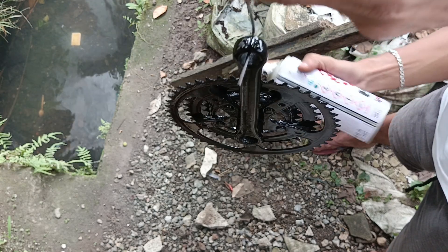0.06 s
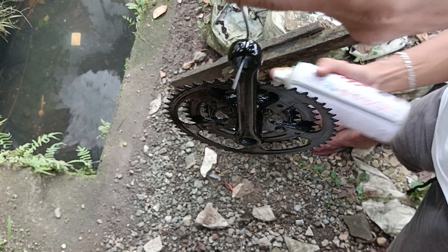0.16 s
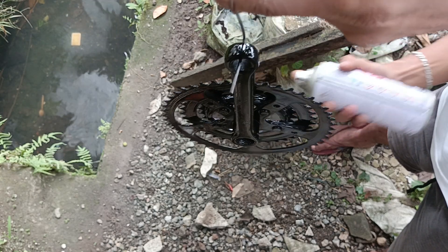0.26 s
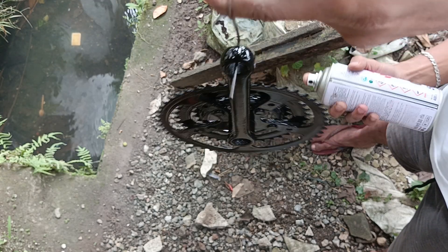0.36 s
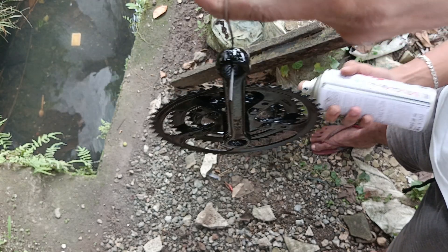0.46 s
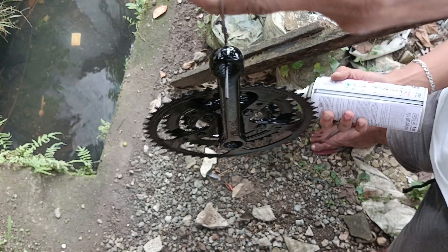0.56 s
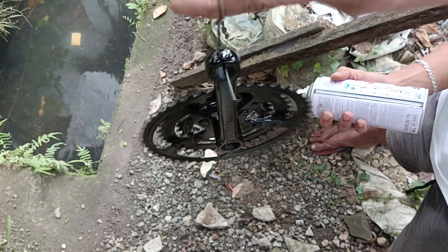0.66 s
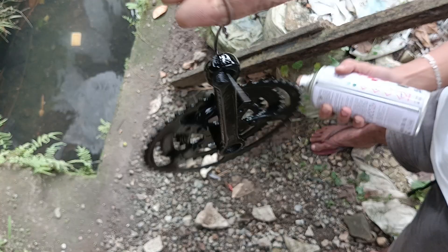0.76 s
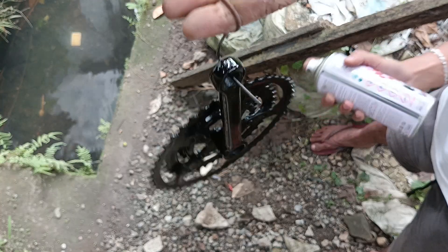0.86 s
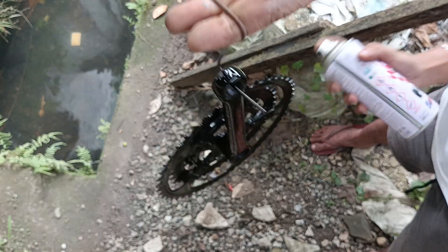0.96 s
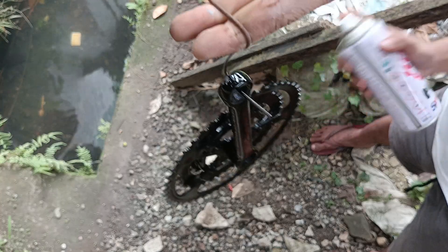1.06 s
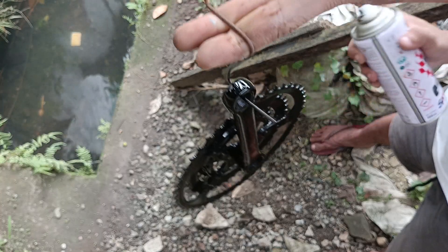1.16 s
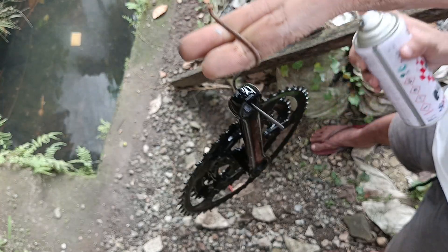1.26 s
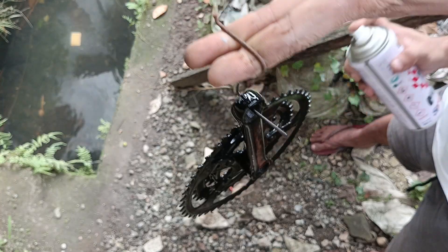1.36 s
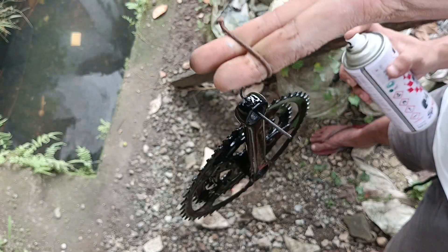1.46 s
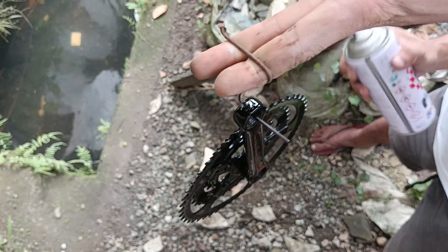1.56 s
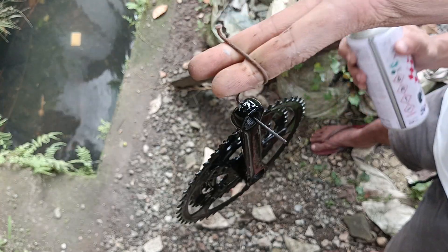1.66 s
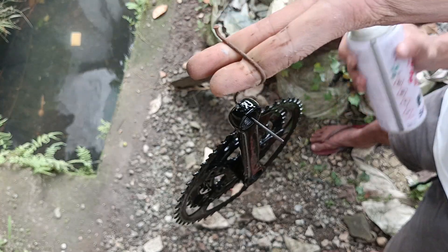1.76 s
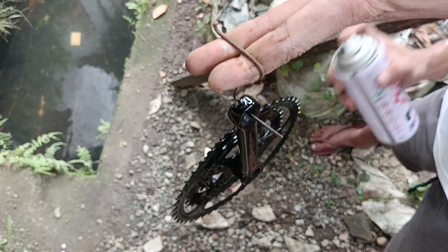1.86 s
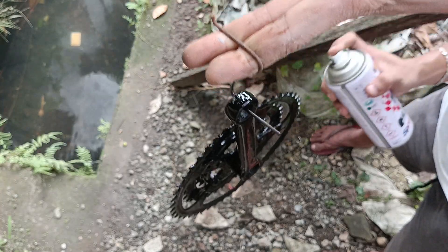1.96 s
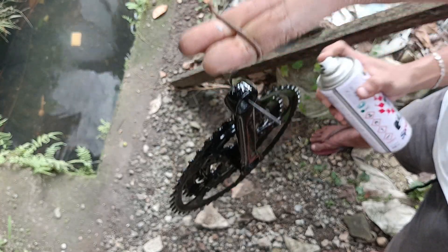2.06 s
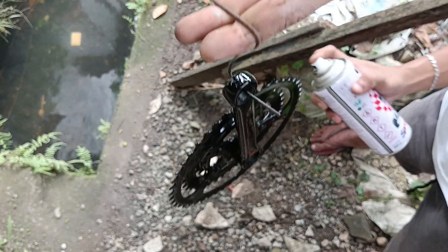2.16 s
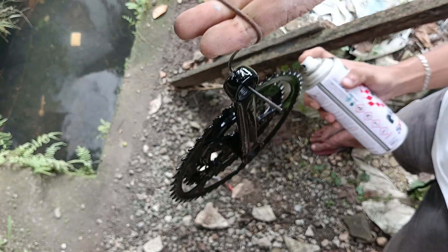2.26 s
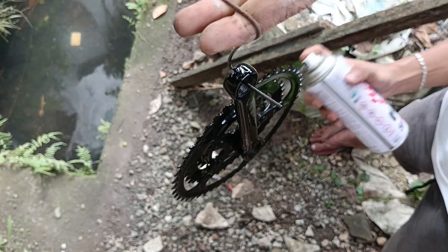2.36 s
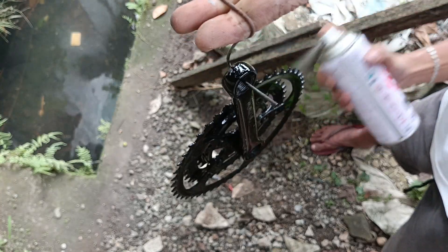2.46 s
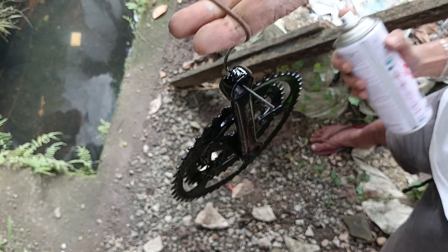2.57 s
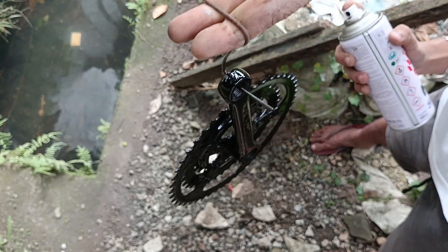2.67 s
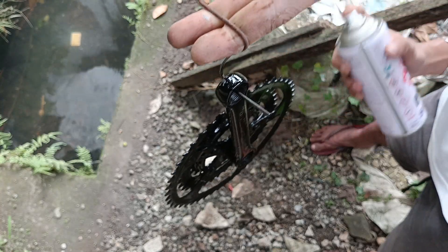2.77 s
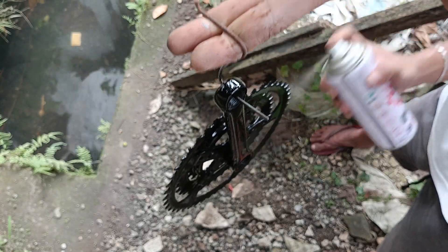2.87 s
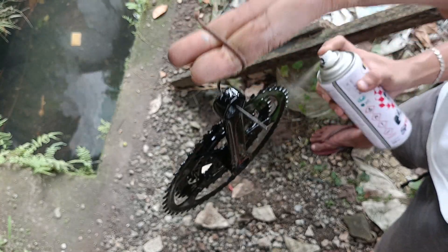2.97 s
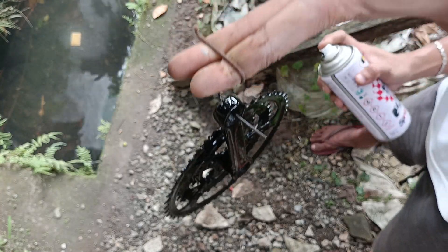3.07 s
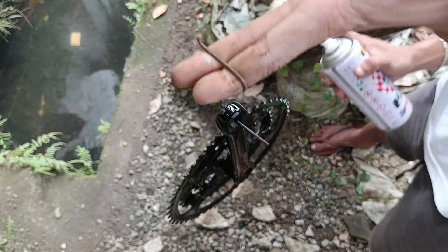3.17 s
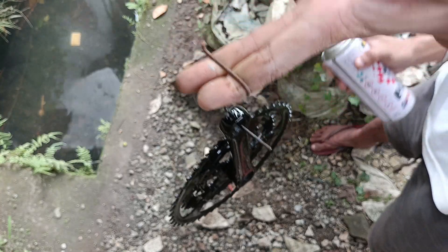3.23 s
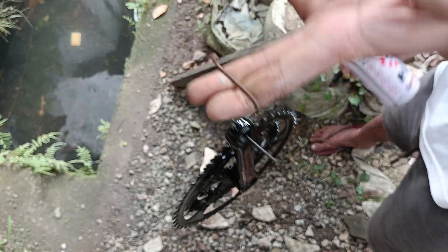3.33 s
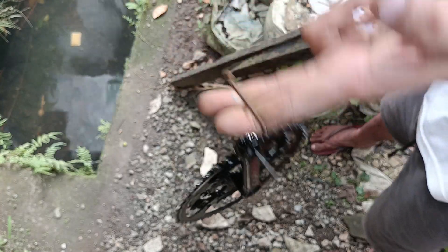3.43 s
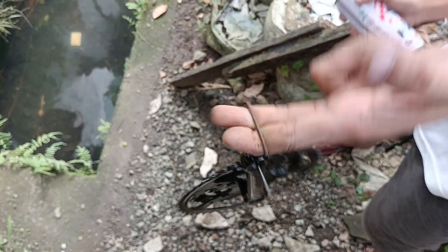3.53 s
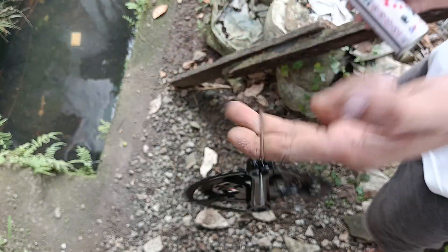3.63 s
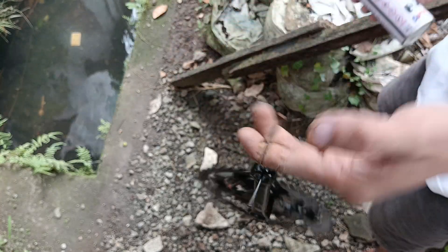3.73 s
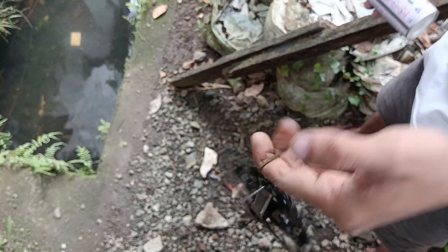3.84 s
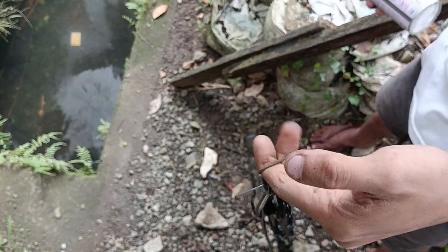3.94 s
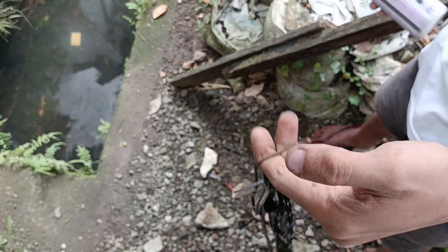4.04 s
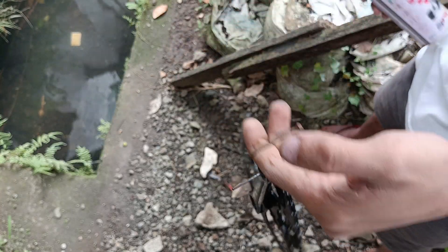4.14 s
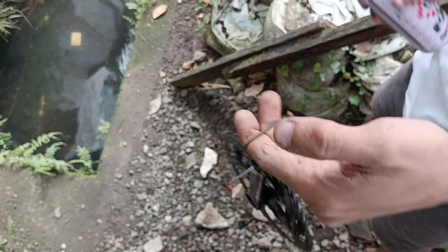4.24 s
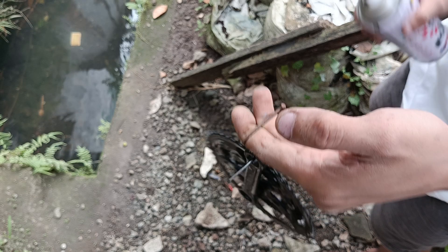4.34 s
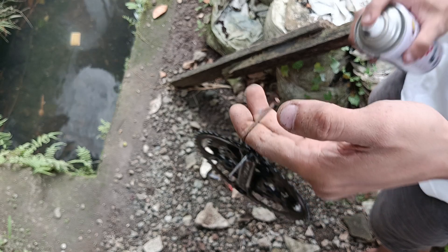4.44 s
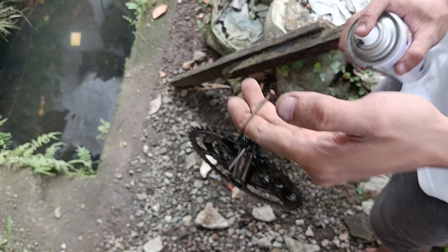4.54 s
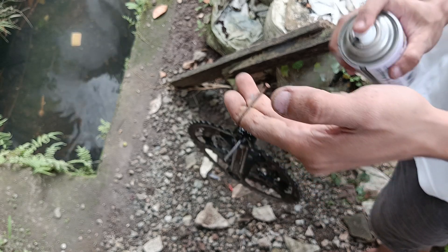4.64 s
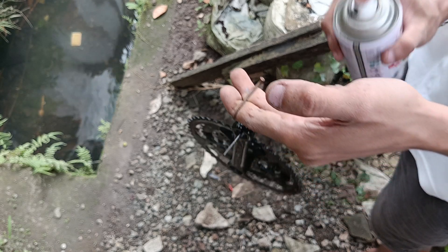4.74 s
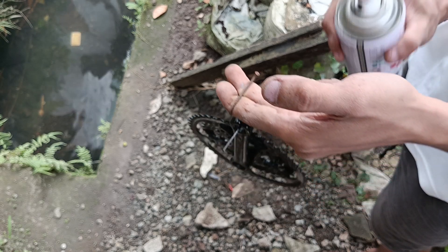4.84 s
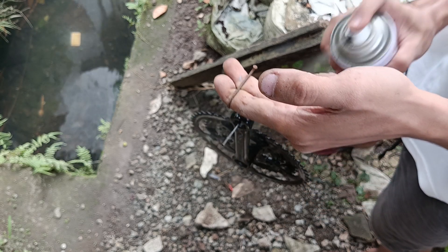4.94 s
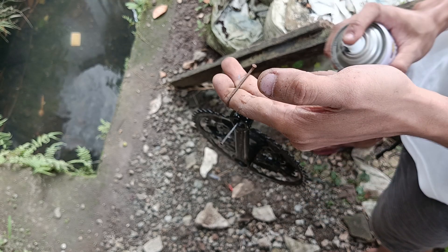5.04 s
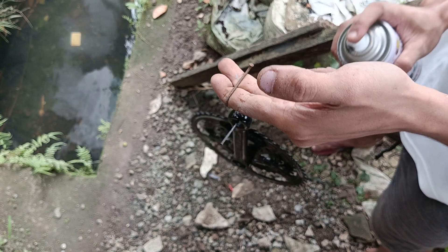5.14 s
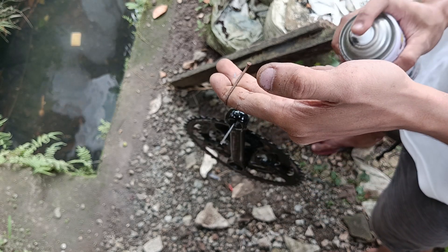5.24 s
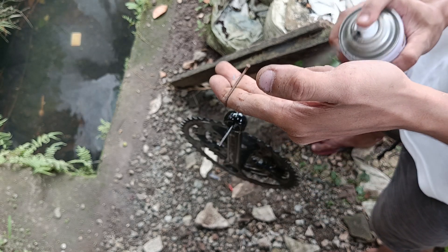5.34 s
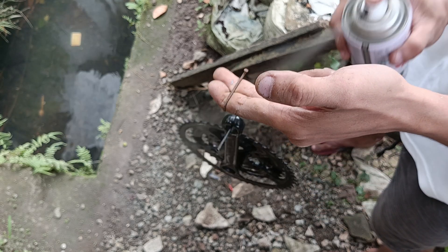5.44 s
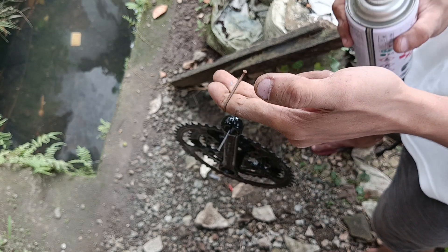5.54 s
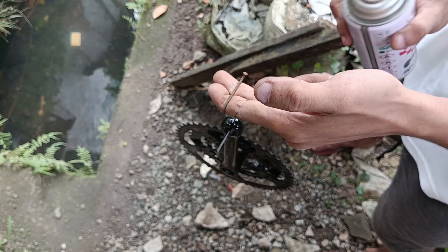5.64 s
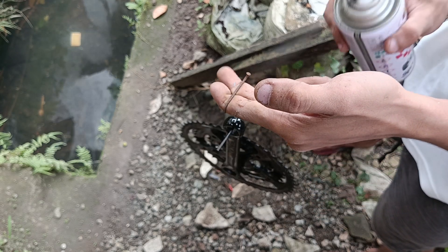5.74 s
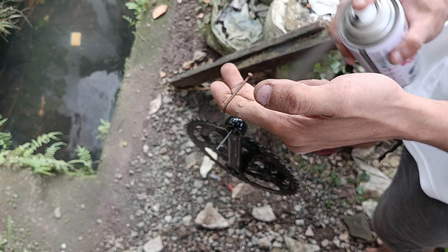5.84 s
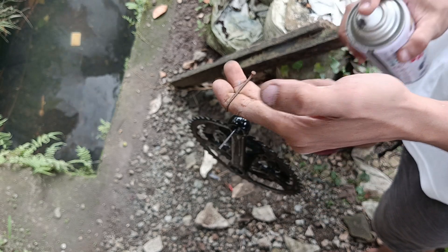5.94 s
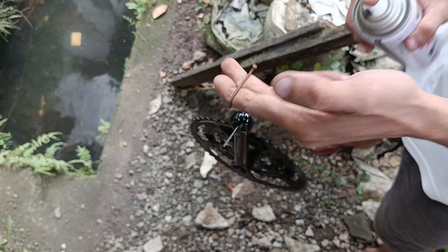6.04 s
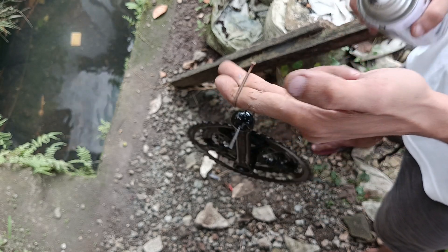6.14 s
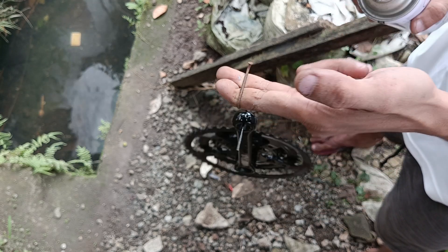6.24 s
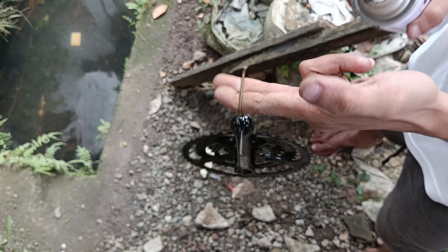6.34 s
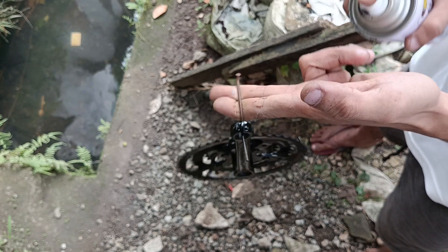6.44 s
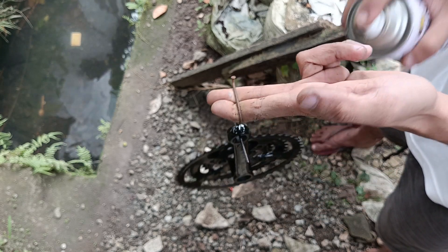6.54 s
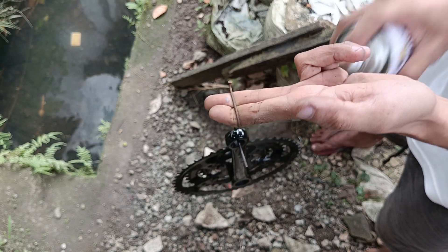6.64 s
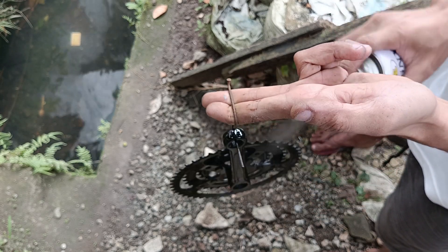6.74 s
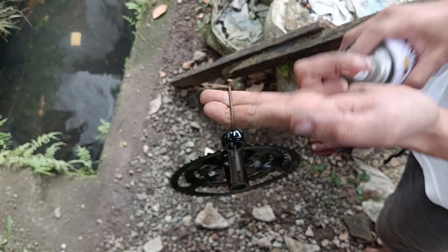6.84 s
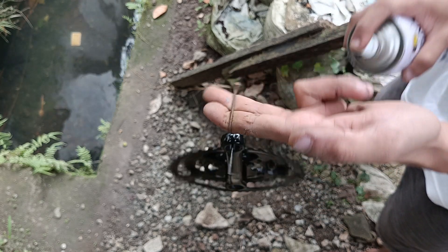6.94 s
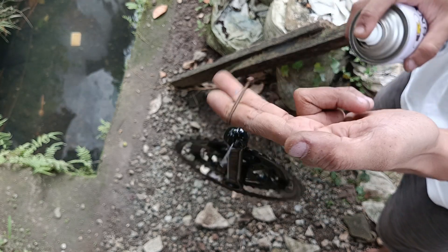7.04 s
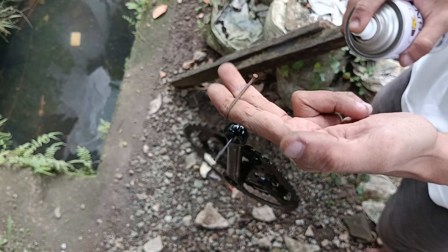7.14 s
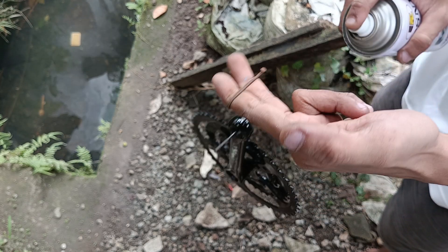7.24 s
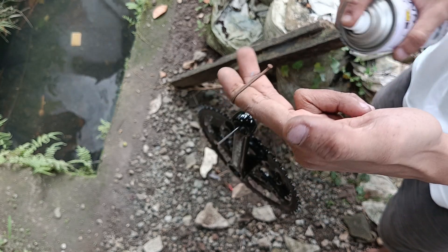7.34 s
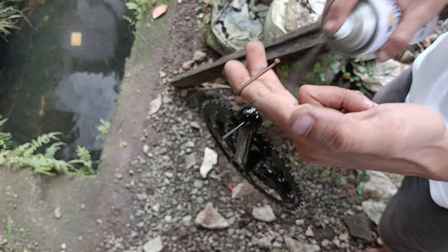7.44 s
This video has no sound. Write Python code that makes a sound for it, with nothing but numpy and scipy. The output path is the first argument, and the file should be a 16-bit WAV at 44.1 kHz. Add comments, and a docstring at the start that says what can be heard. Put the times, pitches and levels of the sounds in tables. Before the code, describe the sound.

Short, sharp aerosol puffs hiss close by, with the can's mixing ball rattling in two bursts over a faint outdoor rumble and hum.

```python
"""Outdoors, an aerosol can sprays a hanging gear in short puffs, close to a mono phone microphone.
A dull swish opens; after the first puff, at 0.85 s, the mixing ball rattles on the can wall.
More puffs run to 3.1 s with duller swishes among them; at 4.4 s the ball rattles again.
Puffs go on to 6.9 s, with two swishes near 6.3 s. The puffs are shaped noise, the ball damped modes.
Behind, all from noise: far rumble, gated hum, insects, and faint patches and streaks of noise suppression."""
import sys
import numpy as np
from scipy import signal
from scipy.fft import rfft, irfft
from scipy.io import wavfile
from scipy.ndimage import uniform_filter1d

SR = 44100
rng = np.random.default_rng(int(sys.argv[2]) if len(sys.argv) > 2 else 0)


def magnitude_from_level(level_db):
    """Linear magnitude for a level in decibels (20 dB per decade)."""
    exponent = np.asarray(level_db, float) / 20
    return 10 ** exponent


def to_wav(s):
    """Save 16-bit WAV."""
    ch = np.atleast_2d(s).T  # columns
    pcm = np.round(np.clip(ch, -1, 1) * 32767)  # PCM
    wavfile.write(sys.argv[1], SR, pcm.astype(np.int16))


N = 330750
T = np.arange(N) / SR  # s

# presses of the nozzle: opens t/s, loudest t/s, shuts t/s, jet hiss level/dB, midrange level/dB
PUFFS = [(0.189, 0.327, 0.38, -34.5, -45.5), (1.544, 1.657, 1.715, -35.5, -42),
         (1.913, 2.07, 2.108, -36, -43.5), (2.399, 2.505, 2.643, -32.5, -43),
         (2.914, 3.01, 3.102, -33.5, -42), (4.627, 4.77, 4.8, -32.5, -40),
         (4.947, 5.048, 5.19, -33.5, -40.5), (5.355, 5.52, 5.577, -31.5, -41),
         (5.818, 5.95, 6, -32.5, -40.5), (6.69, 6.87, 6.875, -37, -42.5)]
# colour of the jet: f/Hz, relative spectral level/dB
JET_COLOUR = [(530, -68), (900, -17), (967, -36.5), (1080, -4), (1300, -1), (1960, -5), (2230, -6),
              (2550, 0.5), (3200, -6.5), (5040, 0), (7750, -5), (9060, -3), (11600, -4), (14400, 2.5),
              (15700, -4)]
# stream crossing the gear, a low flutter: centre t/s, length/s, level/dB
FLUTTERS = [(1.623, .3, -57.5), (2.585, 0.11, -54.5), (3.029, .13, -59.5), (5.608, 0.063, -60),
            (6.018, 0.11, -59), (6.406, 0.065, -69.5), (6.871, 0.092, -55.5)]
# ball striking the can wall: t/s, crack level/dB, crack f/Hz,
# wall thud setting/dB, sharp top setting/dB (both relative to the crack)
CLACKS = [(0.848, -9.5, 3050, -45.5, -18), (0.8746, -9.5, 6150, -44, -31), (0.9, -12, 2800, -16, -28.5),
          (0.9543, -15.5, 4650, -34, -31.5), (0.9658, -11.5, 4440, -42, -44.5),
          (0.9823, -18, 2810, -23, -29), (1.0156, -11, 5300, -39, -18), (1.0431, -26.5, 5230, -4, -17),
          (1.098, -25.5, 2800, -9, -27), (1.106, -23, 6200, -23, -14), (1.124, -35.5, 2620, -0.5, -24.5),
          (1.3158, -6.5, 4400, -21, -13), (1.3215, -1, 6340, -26.5, -26.5), (1.322, -24, 2600, 2, -32),
          (1.4368, -28, 3617, 3, -23), (1.4968, -28, 4700, -6, -36), (1.502, -17, 6410, -6.5, -6),
          (1.5254, -21, 4600, -12, -26), (1.564, -24.5, 2980, -5.5, -14), (1.5828, -15, 4500, -13.5, -16),
          (1.5956, -24, 3000, -4, -14), (1.6327, -24.5, 5750, -4.5, -15), (1.643, -23, 6060, -4, -17),
          (1.761, -24.5, 4690, -12, -24.5), (3.176, -42, 4500, -28, -35), (4.4147, -17, 3900, -10.5, -12),
          (4.4596, -7, 8300, -18, -11), (4.4722, -11, 7000, -12.5, -25), (4.4859, -22, 10500, -34, -20.5),
          (4.517, -30.5, 2950, 2.5, -2.5), (4.568, -14.5, 5840, -11.5, -7), (4.5837, -29.5, 5150, 2.5, -17),
          (4.642, -17.5, 2880, -12, -19), (4.6791, -18, 2500, -10, -4), (4.6847, -20.5, 2540, -7, -28),
          (4.733, -20.5, 6700, -7, -19), (4.7513, -15.5, 5240, -30, -12), (4.812, -25, 5160, -2.5, -3.5),
          (4.8637, -17, 2640, -47, -20), (4.9576, -28.5, 6050, -8, -26)]
# modes of the can wall before their scatter: f/Hz, level/dB, t60/s
CAN_MODES = [(1050, -7, 0.024), (1350, 1.5, .022), (1650, 3, .022), (2072, -6, 0.026), (2800, -2.5, .03),
             (3640, -12.5, 0.012), (4570, -1, 0.023), (6380, -1, .03), (6930, -5, .05), (8480, -8, 0.05),
             (10000, -14, 0.04)]
# ball rolling and tapping lightly while the can moves: from t/s, to t/s, mean crack level/dB
ROLLS = [(0.859, 1.16, -38.5), (1.337, 1.419, -38), (1.532, 1.71, -29), (4.622, 4.821, -29.5),
         (4.872, 4.932, -31.5)]
# dull swishes: starts t/s, loudest t/s, ends t/s, level/dB
SWISHES = [(0.0, 0.03, 0.21, -61.5), (1.817, 1.85, 2.2, -52), (3.274, 3.324, 3.34, -53),
           (6.249, 6.294, 6.33, -52.5), (6.316, 6.36, 6.43, -42.5)]
# colour of the swishes: f/Hz, relative spectral level/dB
SWISH_COLOUR = [(290, -61), (500, -35), (613, -3), (678, -17), (988, -8), (1280, -4), (1790, 2.5),
                (15100, -21.5), (16000, -34)]
# faint midrange background noise, left by noise suppression: t/s, level/dB
MIDRANGE_LEVEL = [(0, -59), (.47, -62), (.83, -58), (1.3, -62.5), (1.8, -57), (2.25, -57.5), (2.38, -72.5),
                  (2.75, -62.5), (2.9, -66.5), (3.5, -64.5), (4.05, -70.5), (4.11, -65), (4.27, -71),
                  (4.35, -71), (4.4, -63), (5.3, -69), (5.8, -66.5), (6.22, -68), (6.65, -65.5), (7.0, -63),
                  (7.22, -70.5), (7.5, -67)]
# colour of the midrange background: f/Hz, relative spectral level/dB
MIDRANGE_COLOUR = [(260, -33.5), (450, -12.5), (520, -19.5), (636, -15), (778, -27), (1410, -3),
                   (1610, -13), (2100, -6), (2400, -15), (4600, -21.5), (5140, -32.5), (6500, -26.5),
                   (8450, -59), (14300, -120)]
# narrow noise streaks of noise suppression, mostly brief, some steady; the row at 3.11 s is a brief crackle
# near 4.5 kHz # as the spray sputters, and the last row is a steady narrow line of the far rumble: # start t/s,
# length/s, f/Hz, width f/Hz, level/dB
STREAKS = [(0, 0.51, 462, 79, -62), (1.497, 0.84, 685, 42, -67.5), (3.233, 0.17, 895, 62, -64),
           (3.516, 0.25, 888, 70, -65.5), (3.6, 0.21, 1274, 110, -62.5), (4.079, 0.11, 1990, 240, -59.5),
           (4.303, 0.073, 1120, 95, -63.5), (4.311, 0.077, 4000, 620, -62), (4.414, 0.36, 600, 93, -63.5),
           (5.471, 0.34, 900, 67, -62), (5.6, 0.58, 1645, 31, -67), (6.499, 0.21, 3817, 90, -67.5),
           (5.625, 0.228, 2260, 70, -73), (6.116, 0.13, 924, 110, -58.5), (6.852, 0.86, 401, 90, -58.5),
           (3.11, 0.11, 4530, 640, -59), (6.236, 0.05, 1880, 140, -52.5), (6.95, 0.6, 1266, 69, -71.5),
           (0, 0.33, 1200, 140, -59.5), (0, 6.8, 81.3, 14.3, -57)]
# steady hum, gated on and off by noise suppression: on t/s, off t/s, level/dB
HUMS = [(0, 1.77, -55.5), (1.95, 2.15, -59.5), (2.22, 2.37, -62), (2.58, 3.25, -57.5), (4.35, 4.54, -60.5),
        (4.76, 4.85, -58), (5.13, 5.72, -60), (5.95, 6.1, -57.5), (6.23, 6.3, -57.5), (6.33, 6.56, -58.5),
        (6.6, 6.8, -66), (6.7, 7.68, -52.5)]
# far rumble, uneven by chance: t/s, level/dB
RUMBLE_LEVEL = [(0, -44), (1.1, -47), (1.6, -51.5), (2.3, -52), (2.45, -46.5), (2.65, -52.5), (2.95, -47),
                (3.7, -48), (4.0, -51.5), (4.15, -47), (4.55, -56), (4.85, -50.5), (5.15, -55),
                (5.35, -47.5), (6.7, -46.5), (7.0, -48), (7.5, -48.5)]
# colour of the rumble: f/Hz, relative spectral level/dB
RUMBLE_COLOUR = [(18, -54.5), (30, -23), (43, -37), (65, -7.5), (86, 3), (139, 4), (164, -0.5), (235, -24),
                 (260, -25), (340, -53), (570, -120)]
# colour of the insects: f/Hz, relative spectral level/dB
INSECT_COLOUR = [(3820, -45.5), (6500, -18.5), (7260, -3.5), (9100, 0), (10100, -8.5), (11000, -11.5),
                 (14300, -44.5), (22000, -120)]

# burst shapes: _db in dB, _s in s, _db_s in dB per s
JET_SHAPE = dict(leap_db=17, leap_s=0.0175, swell_db=5, sag_db_s=57,
                 drop_db=11.5, drop_s=0.02, trail_db_s=328)
MID_SHAPE = dict(leap_db=20, leap_s=0.014, swell_db=1.5, sag_db_s=40,
                 drop_db=9.5, drop_s=0.031, trail_db_s=249)
BODY_SHAPE = dict(leap_db=11.5, leap_s=0.019, swell_db=-2, sag_db_s=34.5,
                  drop_db=9.5, drop_s=0.026, trail_db_s=105)
SWISH_SHAPE = dict(leap_db=8.5, leap_s=0.018, swell_db=3, sag_db_s=37,
                   drop_db=1.5, drop_s=0.037, trail_db_s=176)
BODY_LATE_S, BOTTOM_HZ, BOTTOM_FILL_S = 0.014, 1250, 0.093  # the lowest part fills in slowly
RING_HZ, RING_WIDTH_HZ, RING_DB, RING_S = 2690, 160, -4, 0.076  # level relative to the midrange
TAP_GAP_S, TAP_HZ, TAP_THUD_DB, TAP_TOP_DB = 0.022, 3260, -3.5, -19.5
HUM_HZ, HUM_WIDTH_HZ, HUM_LOW_DB, HUM_FADE_S = 323.7, 67.5, -84, 0.042
INSECTS_DB, TREBLE_DB = -75, -82.5
TOP_HZ = 15900  # upper edge of what the microphone keeps


def spray():
    """Gas tears out of the nozzle, treble first and body later; it flutters low on striking the gear."""
    top = patchy(hiss(JET_COLOUR, 11000, 15500, keep=(6500, SR)), 2.0, 0.05, 300)
    mid = patchy(hiss(JET_COLOUR, 1200, 5000, keep=(2300, 6500)), 3.5, 0.06, 200)
    body = patchy(hiss(JET_COLOUR, 1200, 5000, keep=(BOTTOM_HZ, 2300)), 4.0, 0.06, 150)
    bottom = patchy(hiss(JET_COLOUR, 1200, 4830, keep=(1, BOTTOM_HZ)), 3.9, 0.05, 100)
    ring = noise_band(RING_HZ - RING_WIDTH_HZ / 2, RING_HZ + RING_WIDTH_HZ / 2, order=2)
    out = flutter()
    for opens, loudest, shuts, jet_db, mid_db in PUFFS:
        since = np.maximum(T - opens, 0)
        out = out + burst(opens, loudest, shuts, jet_db, **JET_SHAPE) * top
        out = out + burst(opens, loudest, shuts, mid_db, **MID_SHAPE) * mid
        filled = body + bottom * (1 - np.exp(-since / BOTTOM_FILL_S))
        out = out + burst(opens + BODY_LATE_S, loudest, shuts, mid_db, **BODY_SHAPE) * filled
        # the nozzle sings as each puff starts
        singing = np.exp(-since / RING_S) * ring
        out = out + burst(opens, loudest, shuts, mid_db + RING_DB, **MID_SHAPE) * singing
    return bounced(out)


def flutter():
    """Low noise swells as the stream crosses the gear."""
    noise = patchy(noise_band(407, 703), 3.0, 0.04, 60)
    return noise * sum(magnitude_from_level(db) * np.exp(-(2 * (T - s) / length) ** 4) for s, length, db in FLUTTERS)


def burst(opens, loudest, shuts, db, leap_db, leap_s, swell_db, sag_db_s, drop_db, drop_s, trail_db_s):
    """Gain of one burst: leaps up, moves to its peak time, sags, drops on shutting and trails off."""
    since, after = np.maximum(T - opens, 0), np.maximum(T - shuts, 0)
    db = db - leap_db * np.exp(-since / leap_s)
    db = db - swell_db * np.clip((loudest - T) / (loudest - opens), 0, 1)
    db = db - sag_db_s * np.clip(T - loudest, 0, shuts - loudest)
    db = db - drop_db * np.minimum(after / drop_s, 1) - trail_db_s * after
    return np.clip((T - opens) / 0.0047, 0, 1) * magnitude_from_level(db)


def bounced(x, share=0.2, lag_s=0.0011, sway_s=0.00014, sway_hz=2.1):
    """An echo off the gear; its path changes as the hand sweeps, so the comb slides."""
    lag = SR * (lag_s + sway_s * np.sin(2 * np.pi * sway_hz * T))
    echo = np.interp(np.arange(N) - lag, np.arange(N), x)
    return (x + share * echo) / np.sqrt(1 + share ** 2)


def clacks():
    """Ball blows, each a crack of a few ms, the wall's damped modes, and a fizz of paint and near echoes."""
    out, t = np.zeros(N + 8192), np.arange(8192) / SR
    hz, db, t60 = np.transpose(CAN_MODES)[:, :, None]
    low = hz < 2300
    for s, crack_db, crack_hz, thud_db, top_db in [*CLACKS, *taps()]:
        noise = rng.standard_normal(size=(3, len(t)))
        chance = rng.standard_normal(size=(2, len(CAN_MODES), 1))
        crack = band(noise[0], crack_hz / 1.5, crack_hz * 1.3)
        crack = crack + magnitude_from_level(top_db + 10) * band(noise[1], 5000, 24000, order=1)
        crack = crack * np.exp(-t / 0.0011) * (1 - np.exp(-t / 0.0002))
        crack = crack / np.abs(crack).max()
        # every blow lands elsewhere, so the modes share it anew
        share = magnitude_from_level(db + 3.0 * chance[0])
        mode_hz = hz * (1 + 0.058 * chance[1])
        modes = share * np.sin(2 * np.pi * mode_hz * t) * 1000. ** (-t / t60)
        thud = (modes * low).sum(axis=0) * (1 - np.exp(-t / 0.00024))
        thud = thud / np.abs(thud).max()
        ring = (modes * ~low).sum(axis=0)
        fizz = band(noise[2], 1200, 7800) + magnitude_from_level(top_db + 7.5) * noise[2]
        fizz = fizz * (np.exp(-t / 0.0053) + 0.38 * np.exp(-t / 0.035))
        blow = crack + magnitude_from_level(thud_db - 1.0) * thud + magnitude_from_level(-17.5) * (ring + fizz)
        i = int(s * SR)
        out[i:i + len(t)] += magnitude_from_level(crack_db) * blow
    # the small can radiates no bass
    return band(out[:N], 1020, 18000, order=7)


def taps():
    """Light blows of the rolling ball at uneven gaps, in the columns of CLACKS."""
    rows = []
    for start, end, db in ROLLS:
        for k, (late, size, pitch) in enumerate(rng.random(size=(16, 3))):
            s = start + (k + late) * TAP_GAP_S
            if s < end:
                tap_db = db + 6 * (size - 0.5)
                tap_hz = TAP_HZ * 2 ** (pitch - 0.5)
                rows.append((s, tap_db, tap_hz, TAP_THUD_DB, TAP_TOP_DB))
    return rows


def swishes():
    """Soft noise swells, duller than the puffs."""
    noise = patchy(hiss(SWISH_COLOUR, 1500, 7000), 2.0, 0.03, 250)
    return sum(burst(*row, **SWISH_SHAPE) for row in SWISHES) * noise


def midrange():
    """Faint patchy midrange background noise, left by noise suppression."""
    return patchy(hiss(MIDRANGE_COLOUR, 1100, 6000), 7.5, 0.06, 50) * magnitude_from_level(level_over_time(MIDRANGE_LEVEL))


def streaks():
    """Narrow noise streaks of noise suppression, mostly brief, some steady, with ramped ends; one brief band
    near 4.5 kHz at 3.11 s is a crackle as the spray sputters, and one steady low line belongs to the far
    rumble."""
    out = np.zeros(N)
    for start, length, hz, width_hz, db in STREAKS:
        on = (T >= start) & (T < start + length)
        sliver = band(rng.standard_normal(N)[on], hz - width_hz / 2, hz + width_hz / 2)
        to_edge = np.minimum(T[on] - start, start + length - T[on])
        ramps = np.clip(3 * to_edge / length, 0, 1)
        out[on] += magnitude_from_level(db) * ramps * sliver / sliver.std()
    return out


def hum():
    """Steady hum, a narrow noise band, gated on and off by noise suppression."""
    gate = magnitude_from_level(HUM_LOW_DB)
    for start, end, db in HUMS:
        gate = gate + magnitude_from_level(db) * np.clip(np.minimum(T - start, end - T) / HUM_FADE_S + 0.5, 0, 1)
    return patchy(noise_band(HUM_HZ - HUM_WIDTH_HZ / 2, HUM_HZ + HUM_WIDTH_HZ / 2), 3.5, 0.05, 30) * gate


def rumble():
    """Far, low rumble of noise, uneven by chance."""
    return patchy(hiss(RUMBLE_COLOUR, 60, 220), 3.5, 0.08, 40) * magnitude_from_level(level_over_time(RUMBLE_LEVEL))


def insects():
    """A thin, high insect band of noise, made patchy by noise suppression."""
    return patchy(hiss(INSECT_COLOUR, 6500, 12000), 4.5, 0.06, 60) * magnitude_from_level(INSECTS_DB)


def treble():
    """Faint treble background noise, randomly patchy."""
    return patchy(noise_band(10000, 14000), 7.0, 0.02, 3000) * magnitude_from_level(TREBLE_DB)


def hiss(colour, lo_hz, hi_hz, keep=(1, SR)):
    """Coloured noise, scaled to rms 1 between lo_hz and hi_hz, then softly cut outside keep (Hz)."""
    hz, db = np.transpose(colour)
    f = np.arange(N // 2 + 1) * SR / N + 1  # 1 Hz up, so that the logarithm holds
    spectrum = rfft(rng.standard_normal(N)) * magnitude_from_level(np.interp(np.log(f), np.log(hz), db))
    scale = np.std(irfft(spectrum * (f > lo_hz) * (f < hi_hz), N))
    edges = (1 + (keep[0] / f) ** 8) * (1 + (f / keep[1]) ** 8)
    return irfft(spectrum / np.sqrt(edges), N) / scale


def band(x, lo_hz, hi_hz, order=2):
    """Band-pass, its upper edge held below the Nyquist frequency."""
    edges = [lo_hz, min(hi_hz, 0.45 * SR)]
    return signal.sosfilt(signal.butter(order, edges, "band", fs=SR, output="sos"), x)


def noise_band(lo_hz, hi_hz, order=3):
    """Band-passed noise of rms 1."""
    noise = band(rng.standard_normal(N), lo_hz, hi_hz, order)
    return noise / noise.std()


def patchy(x, depth_db, hold_s, width_hz):
    """Patches of the spectrum rise and fall at random; the overall rms is kept."""
    f, s, z = signal.stft(x, SR, nperseg=1024)
    field = rng.standard_normal(z.shape)
    for axis, size in ((0, width_hz / f[1]), (1, hold_s / s[1])):
        for _ in range(2):
            field = uniform_filter1d(field, int(size) + 1, axis=axis)
    y = signal.istft(z * magnitude_from_level(depth_db * field / field.std()), SR, nperseg=1024)[1][:N]
    return y * x.std() / y.std()


def level_over_time(rows):
    """Levels in dB joined by straight lines over time."""
    s, db = np.transpose(rows)
    return np.interp(T, s, db)


def scene():
    """Near sources and background at one microphone: both channels alike."""
    near = spray() + clacks() + swishes()
    background = midrange() + streaks() + hum() + rumble() + insects() + treble()
    mono = near + background
    return np.array([mono, mono])


def band_limit(x):
    """A steep low-pass at the top of the band."""
    return signal.sosfilt(signal.butter(12, 17000, fs=SR, output="sos"), x)


def record(dry):
    """The phone clips the hardest blow, then a steep low-pass cuts the top."""
    clipped = np.clip(dry, -0.9, 0.9)
    low_pass = signal.ellip(8, 0.2, 42, TOP_HZ, fs=SR, output="sos")  # ripple and stopband in dB
    finished = signal.sosfilt(low_pass, clipped)
    return band_limit(finished)


dry = scene()
out = record(dry)
to_wav(out)
```